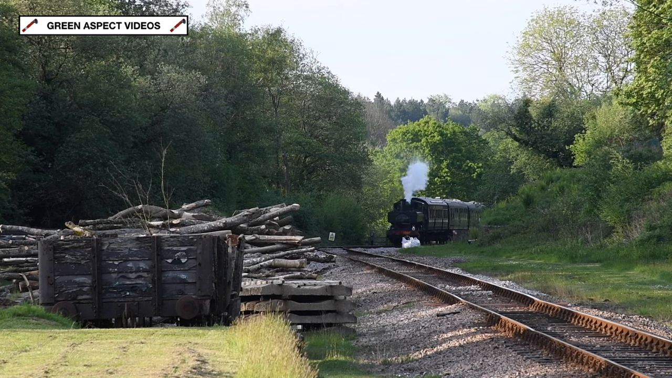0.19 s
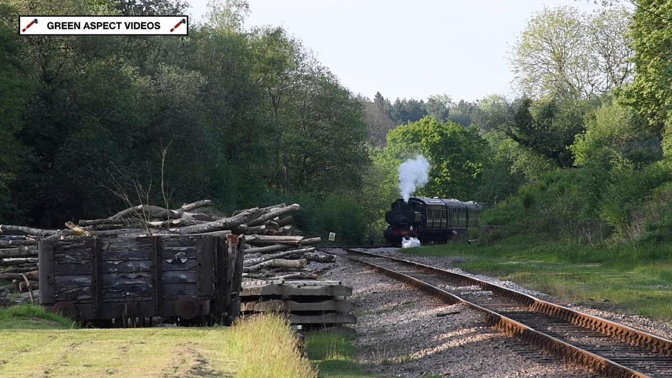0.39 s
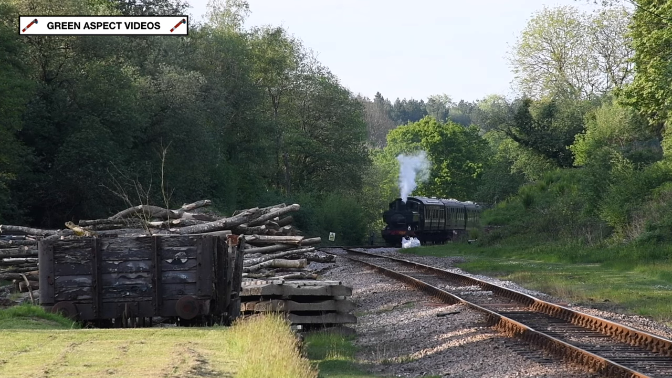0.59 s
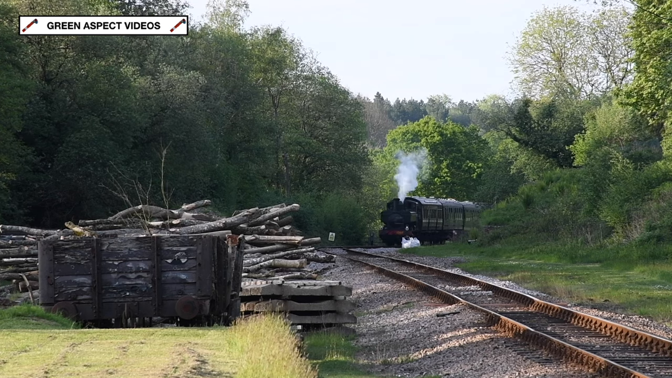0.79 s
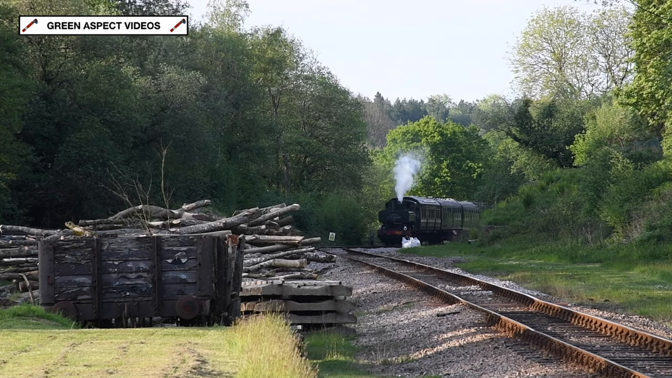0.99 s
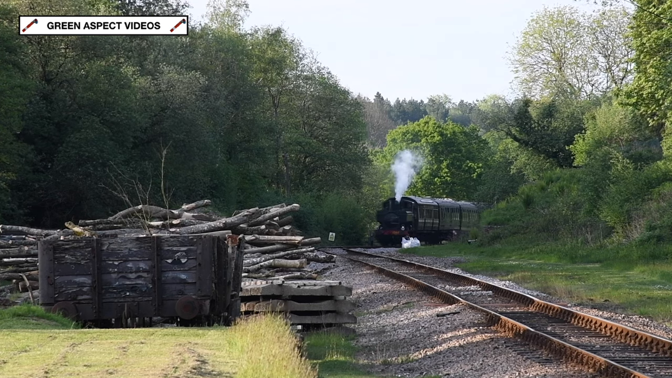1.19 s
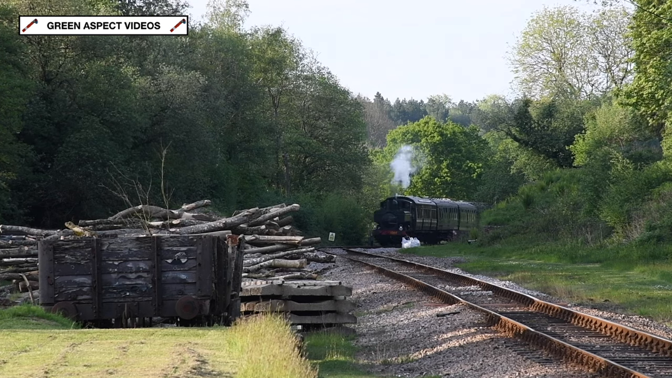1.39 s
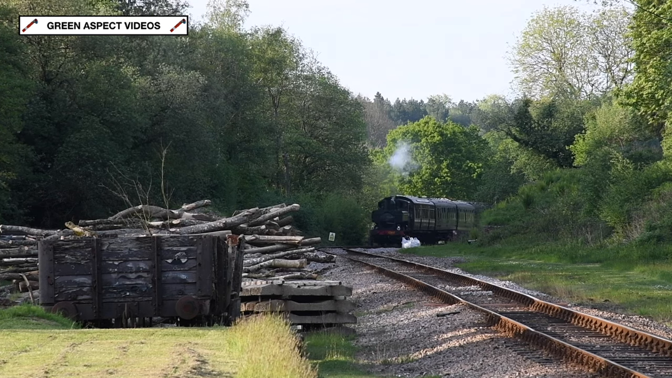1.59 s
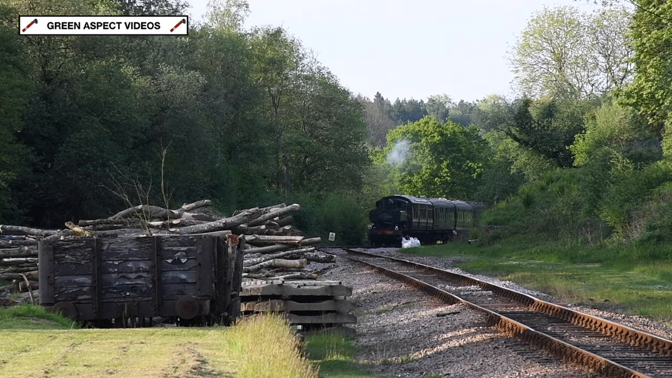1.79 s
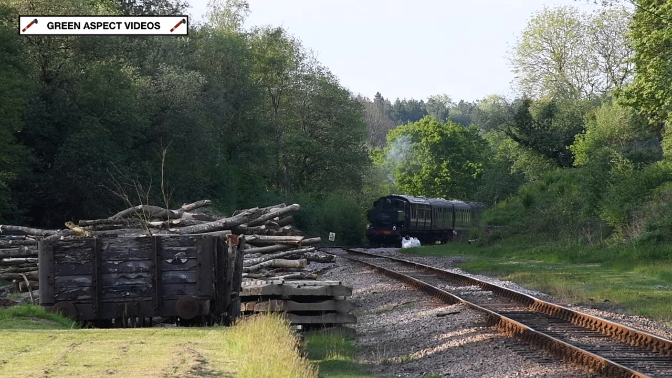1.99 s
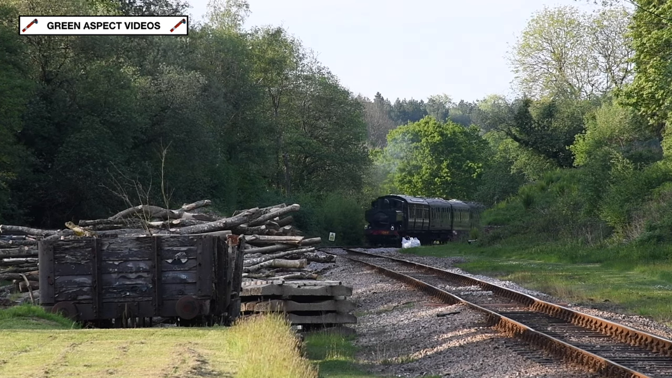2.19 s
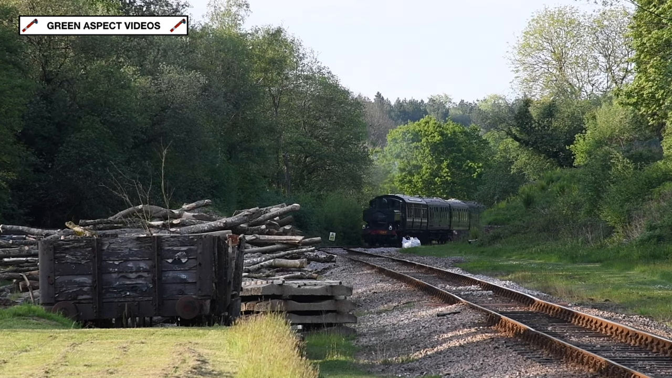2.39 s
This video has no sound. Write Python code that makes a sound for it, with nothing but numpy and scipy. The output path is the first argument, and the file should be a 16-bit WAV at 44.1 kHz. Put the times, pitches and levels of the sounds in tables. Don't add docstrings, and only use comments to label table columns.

```python
import sys
import numpy as np
from scipy import signal
from scipy.fft import rfft, irfft
from scipy.io import wavfile
from scipy.ndimage import uniform_filter1d

SR = 44100
rng = np.random.default_rng(int(sys.argv[2]) if len(sys.argv) > 2 else 0)


def amplitude_ratio(level_db):
    exponent = np.asarray(level_db, float) / 20
    return 10 ** exponent


def pcm_store(signal):
    levels = np.round(np.clip(np.atleast_2d(signal), -1, 1) * 32767)
    wavfile.write(sys.argv[1], SR, levels.astype(np.int16).T)


N = 110250
T = np.arange(N) / SR

# (frequency [Hz], density [dB per Hz])
AIR_SPECTRUM = [(30, -30.5), (50, -12.5), (80, -5), (150, -13.5), (240, -20), (500, -13), (1200, -21.5),
                (3500, -31.5)]
# (frequency [Hz], density [dB per Hz])
AIR_SIDE_SPECTRUM = [(60, -18.5), (140, -9.5), (250, -9.5), (500, -22.5), (3000, -59.5)]
# (time [s], level [dB])
EXHAUST_BEATS = [
    (.05, -50),
    (2.485, -44.5),
]
# (frequency [Hz], density [dB per Hz])
EXHAUST_SPECTRUM = [(100, -7), (400, -6.5), (1200, 21), (2500, -4.5), (5000, -18.5), (10000, -33)]
# (frequency [Hz], 60 dB decay time [s])
WOODS_DECAY = [(300, 1.7), (900, 2.63), (1600, 0.7), (2600, 0.97), (3400, 1.1), (4500, 0.22), (8000, 0.22)]
# (frequency [Hz], level [dB])
WOODS_COLOUR = [(700, -3), (880, 0), (1250, -5), (2600, -3.5), (3400, -9), (4300, -5.5), (8000, -11.5)]
# (time [s], pitch [Hz])
FIRST_PITCH = [(.22, 813.6), (.29, 788.6), (.4, 844.6), (.47, 825.5), (.6, 846.5), (.78, 867),
               (1.05, 867.8), (1.27, 845.6), (1.45, 874), (1.7, 849.1), (2.0, 877.8), (2.09, 864.5)]
# (time [s], level [dB])
FIRST_LEVEL = [(0.225, -17.5), (0.405, -15), (0.469, -34), (0.551, -10.5), (0.639, -15), (0.701, -9),
               (0.853, -17.5), (1.075, -11.5), (1.107, -15.5), (1.247, -17.5), (1.263, -12), (1.377, -25),
               (1.423, -10), (1.527, -24), (1.573, -15), (1.911, -17), (1.995, -12), (2.09, -20.5)]
# (time [s], level [dB], pitch [Hz])
OVERBLOWN = [(0.225, -43, 2480), (0.281, -26, 2530), (0.297, -32.5, 2570), (0.469, -24, 2510),
             (0.493, -14.5, 2470), (0.545, -28.5, 2510), (0.717, -38, 2620), (0.733, -29.5, 2610),
             (1.033, -35.5, 2610), (1.169, -25.5, 2643), (1.227, -30.5, 2590), (1.253, -23, 2570),
             (1.361, -32.5, 2620), (1.647, -29, 2640), (1.911, -37.5, 2630), (1.969, -30.5, 2645),
             (2.011, -37, 2670), (2.09, -29, 2593)]
# (width [Hz], steady share [0-1], skirt level [dB], skirt width [Hz], pitch wander [Hz])
WAVERING = [(32, .85, -24, 70, 6), (55, .45, -12, 170, 22), (90, .0, -10, 280, 40), (35, .1, -20, 80, 12)]
MIXED_MODES = [(0, 0, 1), (1, 0, -1), (2, 1, -1), (1, 0, 1), (2, 0, -1), (2, 0, 1), (1, 1, 1)]
MIXED_LEVELS = [-8, 4.5, 11.5, 3.5, 11, -2, -12.5]
# (frequency [Hz], density [dB per Hz])
JET_SPECTRUM = [(320, -13.5), (500, -7), (1000, -3), (1550, 3.5), (2100, -4.5), (3000, -9), (4700, -16),
                (7500, -36.5)]


def in_time(rows):
    s, *columns = np.transpose(rows)
    return [np.interp(T, s, c) for c in columns]


def at_hz(points, hz):
    p = np.array(points, float)
    return np.interp(np.log(np.maximum(hz, 1)), np.log(p[:, 0]), p[:, 1])


def rms_one(x):
    return x / np.sqrt(np.mean(np.abs(x) ** 2) + 1e-20)


def coloured(spectrum):
    hz = np.fft.rfftfreq(N, 1 / SR) + 1
    low_end = np.minimum(1, (hz / spectrum[0][0]) ** 2)
    high_end = np.minimum(1, (spectrum[-1][0] / hz) ** 2)
    white = rfft(rng.standard_normal(N))
    return rms_one(irfft(white * amplitude_ratio(at_hz(spectrum, hz)) * low_end * high_end, N))


def slow(width_hz):
    r = np.exp(-2 * np.pi * width_hz / SR)
    lead_in = 8000
    z = rng.standard_normal(N + lead_in) + 1j * rng.standard_normal(N + lead_in)
    return rms_one(signal.lfilter([1], [1, -2 * r, r * r], z)[-N:])


def rise(start_s, rise_s):
    return 1 - np.exp(-np.maximum(T - start_s, 0) / rise_s)


def hiss(shape):
    treble = signal.butter(2, 5400, "high", fs=SR, output="sos")
    return amplitude_ratio(-56.5) * signal.sosfilt(treble, rng.standard_normal(shape))


def open_air():
    middle = amplitude_ratio(-50.5 + 1.0 * slow(3).real) * coloured(AIR_SPECTRUM)
    side = amplitude_ratio(-76.5) * coloured(AIR_SIDE_SPECTRUM)
    return middle + side * np.array([[1], [-1]])


def engine_exhaust():
    rise_s, fall_s = 0.01, 0.046
    beats = sum(amplitude_ratio(db) * rise(s, rise_s) * (1 - rise(s, fall_s)) for s, db in EXHAUST_BEATS)
    return beats * coloured(EXHAUST_SPECTRUM)


def far_woods():
    delay_s, swell_s = 0.06, 0.18
    white, tail = rng.standard_normal(N), 0
    late = np.maximum(T - delay_s, 0)
    for low in 150 * 2 ** np.arange(0, 6.5, .5):
        centre = low * 1.19
        band_pass = signal.butter(2, [low, low * np.sqrt(2)], "band", fs=SR, output="sos")
        decay_db = at_hz(WOODS_COLOUR, centre) - 60 * late / at_hz(WOODS_DECAY, centre)
        tail = tail + signal.sosfilt(band_pass, white) * amplitude_ratio(decay_db)
    return 0.72 * rms_one(tail * rise(delay_s, swell_s))


def near_trees():
    decay_s = 0.42
    dull = signal.butter(1, 7000, fs=SR)
    scatter = signal.lfilter(*dull, rng.standard_normal(N))
    return rms_one(scatter * amplitude_ratio(-60 * T / decay_s) * rise(0.0019, 0.0071))


def woods_echo(x):
    response = amplitude_ratio(-13) * far_woods() + amplitude_ratio(-11) * near_trees()
    return signal.fftconvolve(x, response / np.sqrt(N))[:N]


def saturate(z, top):
    return z / (1 + (np.abs(z) / top) ** 4) ** .25


def mode(hz, db, waver, lock=0.):
    width_hz, steady, skirt_db, skirt_hz, wander_hz = waver
    steady = np.clip(steady + lock, 0, .95)
    shake = np.sqrt(steady) + np.sqrt(1 - steady) * slow(width_hz) + amplitude_ratio(skirt_db) * slow(skirt_hz)
    hz = hz + np.sqrt(2) * wander_hz * slow(30).real
    return np.sqrt(2) * amplitude_ratio(db) * shake * np.exp(2j * np.pi * np.cumsum(hz) / SR)


def first_mode(hz, db):
    return mode(hz, db - 2.5, WAVERING[0])


def overblown_mode(open_s):
    scoop_hz, scoop_s = 300, 0.01472
    lock_from_db, lock_per_db = -27, .05
    db, hz = in_time(OVERBLOWN)
    hz = hz - scoop_hz * (1 - rise(open_s, scoop_s))
    return mode(hz, db, WAVERING[1], lock_per_db * np.maximum(db - lock_from_db, 0))


def fifth_mode(open_s):
    start_hz, end_hz, settle_s = 3943, 4255, 0.6
    hz = start_hz + (end_hz - start_hz) * rise(open_s, settle_s)
    return mode(hz, -40.5, WAVERING[2])


def edge_tone(hz, db, open_s):
    smooth_db = uniform_filter1d(db, size=2205)
    return rise(open_s, .7) * mode(hz * .89, -21 + smooth_db, WAVERING[3])


def mixed_tones(modes, pressure):
    blur_hz, blur = 60, 0.36
    out = 0
    for (a, b, sign), db in zip(MIXED_MODES, MIXED_LEVELS):
        partner = modes[b] if sign > 0 else np.conj(modes[b])
        out = out + amplitude_ratio(db) * pressure * (1 + blur * slow(blur_hz)) * modes[a] * partner
    return out


def jet_roar(pressure):
    puff_s, puff_width_s = 2.075, .02
    puff_db = 3.5 * np.exp(-((T - puff_s) / puff_width_s) ** 2)
    flutter_db = 3.5 * slow(39).real
    return pressure * amplitude_ratio(-36 + puff_db + flutter_db) * coloured(JET_SPECTRUM)


def whistle():
    open_s, attack_s, swell_s = .212, 0.0085, 0.11
    closing = 1 - rise(2.085, 0.029)
    valve = rise(open_s, attack_s) * closing
    pressure = rise(open_s, swell_s) * closing
    (hz,), (db,) = in_time(FIRST_PITCH), in_time(FIRST_LEVEL)
    first = saturate(valve * first_mode(hz, db), .42)
    third = valve * overblown_mode(open_s)
    fifth = pressure ** 2 * fifth_mode(open_s)
    tones = first + third + fifth + valve * edge_tone(hz, db, open_s)
    tones = tones + amplitude_ratio(-27) * third ** 3
    tones = tones + mixed_tones([saturate(first, .2), third, fifth], pressure)
    return tones.real + jet_roar(pressure)


def scene():
    blast = whistle()
    return open_air() + engine_exhaust() + woods_echo(blast) + blast


def top_cut(x):
    return signal.sosfilt(signal.butter(12, 15630, fs=SR, output="sos"), x)


def record(dry):
    return top_cut(dry + hiss(dry.shape))


dry = scene()
out = record(dry)
pcm_store(out)
```